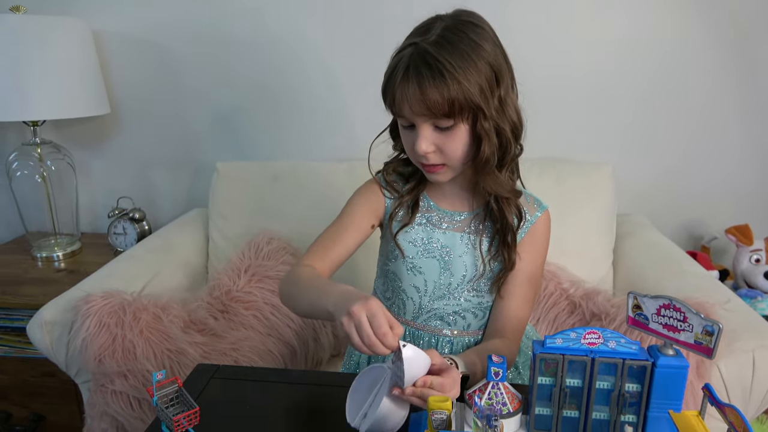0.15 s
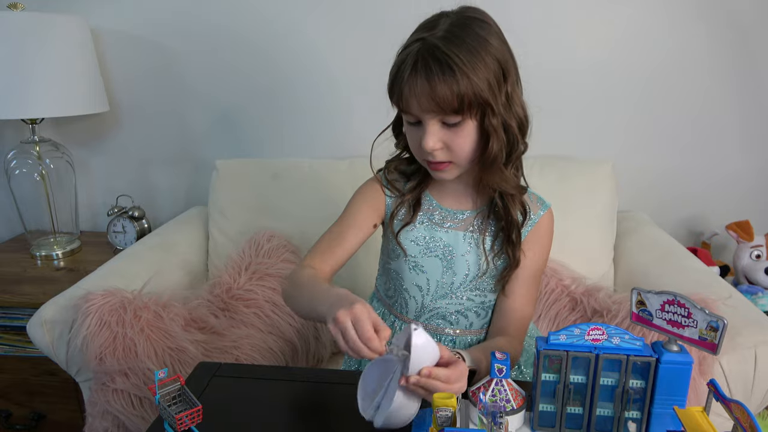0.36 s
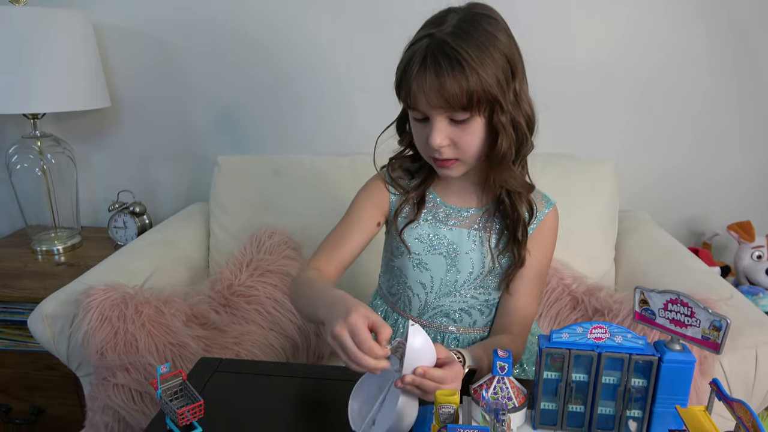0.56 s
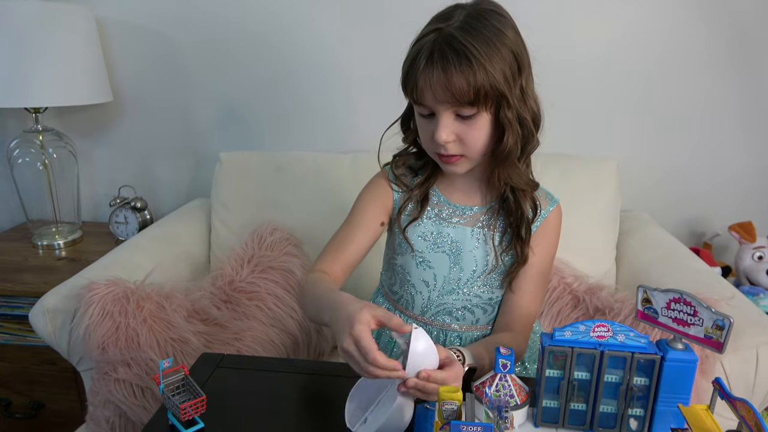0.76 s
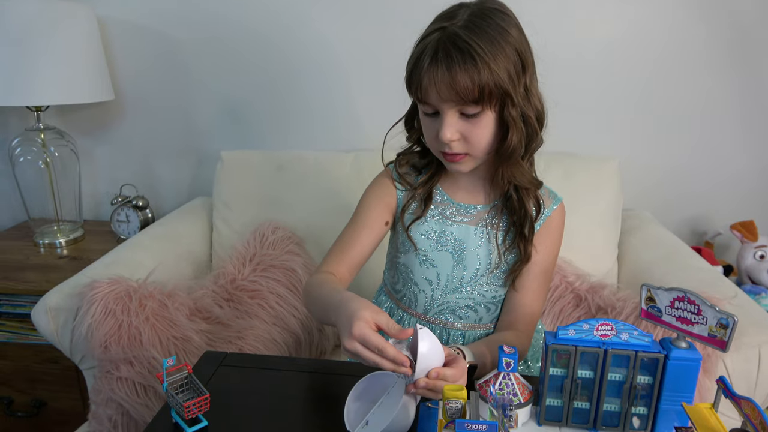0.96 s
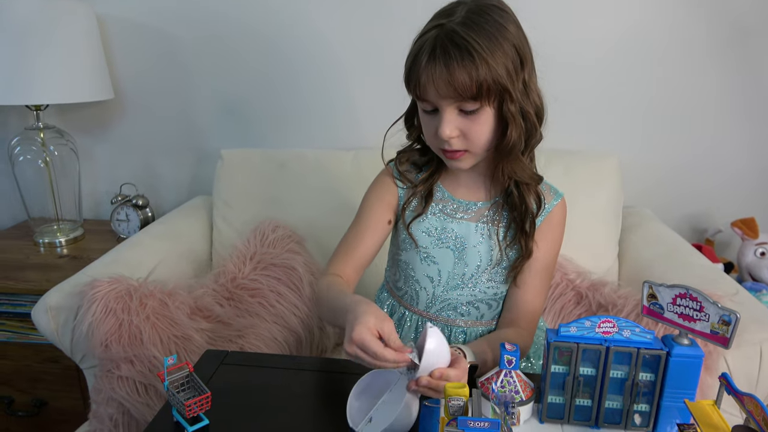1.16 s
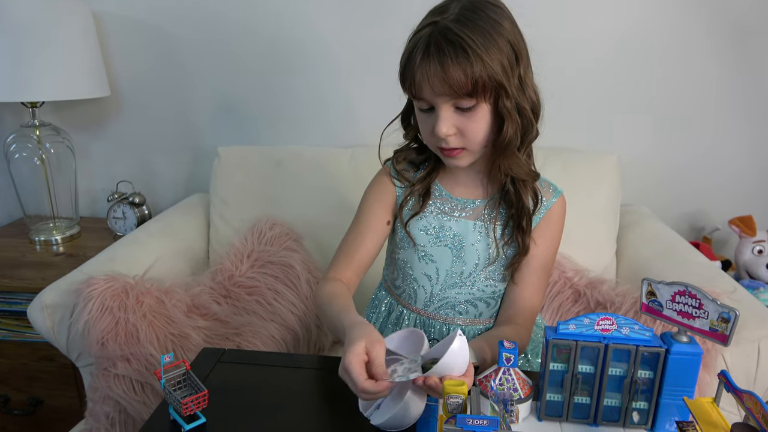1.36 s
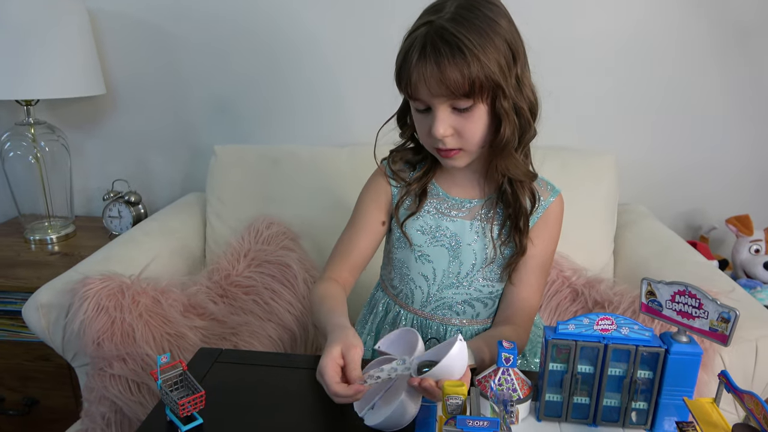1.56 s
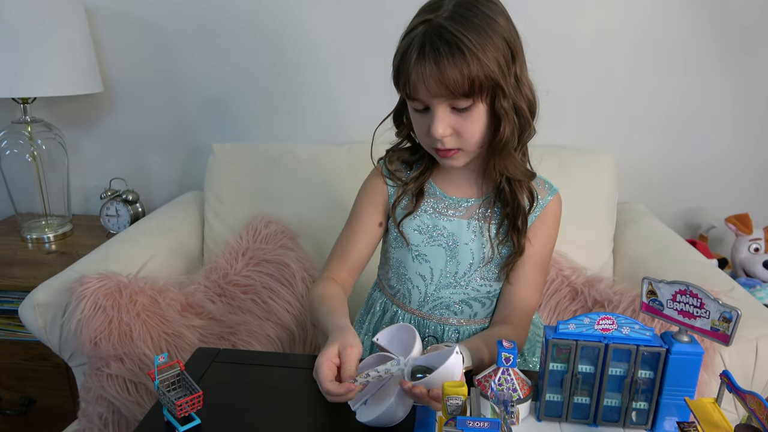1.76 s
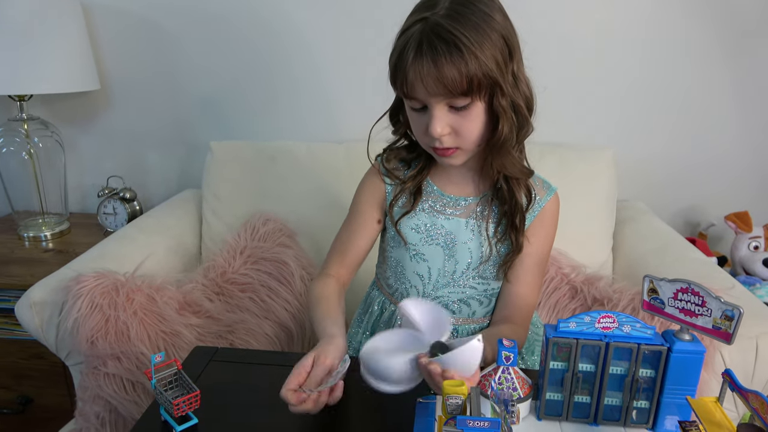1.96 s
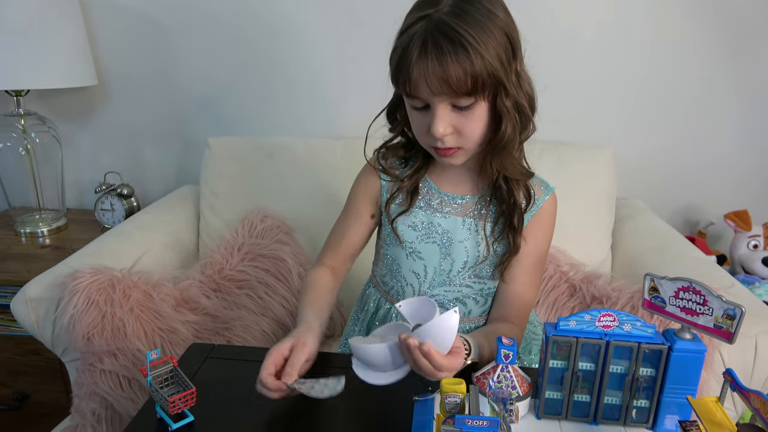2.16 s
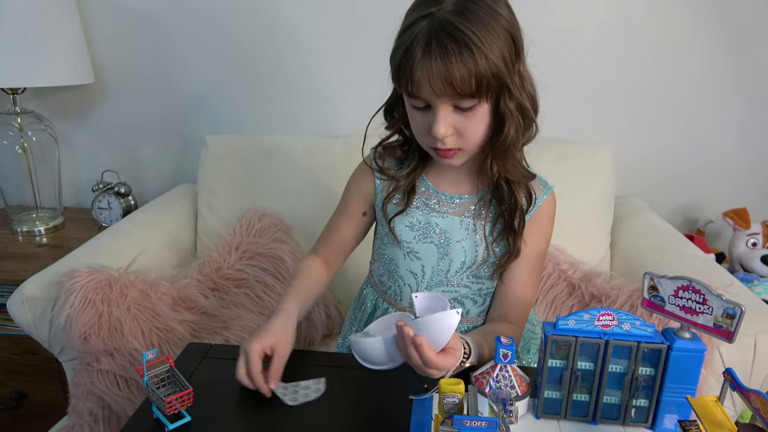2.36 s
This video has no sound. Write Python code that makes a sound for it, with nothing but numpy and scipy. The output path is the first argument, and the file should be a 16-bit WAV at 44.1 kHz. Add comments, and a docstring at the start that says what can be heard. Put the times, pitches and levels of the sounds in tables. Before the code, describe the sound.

A hard plastic toy capsule is pulled open with a quick rattling crack and knocks, then soft handling bumps, a flap, crisp film crinkling, and a final clatter and clonk, close to the microphones in a quiet living room.

```python
"""A hard plastic toy capsule is pulled open over a table in a small living room. Its thin shell segments judder
apart, knock, flap, ping, clatter and clonk: each blow is a noisy contact plus decaying modes, and the grinding
rims are a dense run of tiny slips. Soft thumps on the table lie between. A small wrapped item is drawn out; its
film crinkles in random creases and snaps in short bursts. The table thumps faintly, the room adds decaying
noise echoes, and its still air is steady coloured noise."""
import sys
import numpy as np
from scipy import signal
from scipy.fft import rfft, irfft, next_fast_len
from scipy.io import wavfile

SR = 44100
rng = np.random.default_rng(int(sys.argv[2]) if len(sys.argv) > 2 else 0)


def generate_wav(signal):
    """Clip the signal to [-1, 1] and save it as 16-bit WAV at the path in sys.argv[1]."""
    frames = np.transpose(np.atleast_2d(signal))
    scaled = np.clip(frames, -1, 1) * 32767
    pcm = np.round(scaled).astype(np.int16)
    wavfile.write(sys.argv[1], SR, pcm)


N = 106766
T = np.arange(N) / SR  # s
BANDS = 25 * 2 ** (np.arange(29) / 3)  # third-octave centres, Hz
BANK = [signal.butter(2, [hz / 2 ** (1 / 6), hz * 2 ** (1 / 6)], "band", fs=SR, output="sos") for hz in BANDS]
MOVE_S = .06  # time between one echo pattern and the next


def from_db(db):
    """Level to amplitude: 20 dB is a factor of ten."""
    return 10 ** (np.asarray(db) / 20)


def at_hz(points, hz):
    """Logarithmic frequency scale: interpolate a (frequency, value) table along it."""
    f, v = np.transpose(points)
    return np.interp(np.log(hz), np.log(f), v)


def unit(x):
    """Energy normalization: scale each row to a sum of squares of 1."""
    return x / np.sqrt(np.sum(x ** 2, axis=-1, keepdims=True) + 1e-30)


def fade(t, t60):
    """Exponential decay: the level falls 60 dB in t60 seconds."""
    return from_db(-60 * t / max(t60, 1e-3))


def add(track, s, sound):
    """Superposition: mix a sound into the track from time s."""
    i = int(np.clip(s * SR, 0, N - 1))
    track[i:i + len(sound)] += sound[:N - i]


def coloured(x, colour):
    """Filter-bank shaping: a steady signal gets a set level in each third octave."""
    x = np.pad(x, (SR // 2, 0), "reflect") + 1e-18  # lead-in lets the filters settle
    total = 0
    for k, (hz, sos) in enumerate(zip(BANDS, BANK)):
        band = unit(signal.sosfilt(sos, x)[-N:])
        total = total + from_db(at_hz(colour, hz)) * band * (-1) ** k  # neighbouring bands alternate in sign
    return total * np.sqrt(N)


def causal_filter(gain_db):
    """Minimum phase: folding the cepstrum gives a causal response with these gains."""
    cepstrum = irfft(np.log(from_db(gain_db)))
    half = cepstrum.shape[-1] // 2
    fold = np.r_[1, np.full(half - 1, 2), 1, np.zeros(half - 1)]
    return np.exp(rfft(cepstrum * fold))


def moving(x, responses):
    """Time-varying convolution: the hands move, so each short stretch meets another pattern of echoes."""
    hop, out = int(MOVE_S * SR), np.zeros(N)
    padded, window = np.pad(x, (0, 3 * hop)), signal.get_window("hann", 2 * hop)
    for k, response in enumerate(responses):
        stretch = padded[k * hop:(k + 2) * hop] * window
        add(out, (k * hop + .5) / SR, signal.fftconvolve(stretch, response))
    return out


# still air of the room: (frequency [Hz], relative level per third octave [dB])
AIR_COLOUR = [(25, -86), (40, -73.5), (65, -88.5), (125, -79), (300, -77.5), (600, -68.5), (1000, -71),
              (2000, -77.5), (3300, -88), (5000, -72.5), (10000, -84.5), (15000, -81)]


def still_air():
    """Stationary broadband noise: the air of the room is a steady random signal, coloured by band."""
    return coloured(rng.standard_normal(N), AIR_COLOUR)


# decay of the room: (frequency [Hz], reverberation time [s])
ROOM_T60 = [(150, 0.24), (600, 0.52), (2000, 0.32), (5000, 0.45), (14000, 0.37)]
# reverberant against direct sound: (frequency [Hz], level [dB])
ROOM_LEVEL = [(150, 2), (600, -6), (2000, -0.5), (5000, -3), (14000, -6)]
WALL_DELAY_S, NEAR_ECHO_DB = 0.012, -9
WALL_ECHO_DB, WALL_ECHO_S = 6.5, 0.024  # the first wall echoes stand out of the tail


def room(x):
    """Statistical reverberation: weak echoes from table and furniture, then walls and a tail dying by octave."""
    t = T[:SR * 3 // 5]
    wall_db = WALL_ECHO_DB * np.exp(-np.abs(t - WALL_DELAY_S) / WALL_ECHO_S)
    density = from_db(np.where(t < WALL_DELAY_S, NEAR_ECHO_DB, wall_db))
    white = rng.standard_normal((2, int(N / SR / MOVE_S), len(t)))
    responses = 0
    for k, hz in enumerate(100 * 2. ** np.arange(8)):
        sos = signal.butter(2, [hz / np.sqrt(2), hz * np.sqrt(2)], "band", fs=SR, output="sos")
        envelope = unit(density * fade(t, at_hz(ROOM_T60, hz))) * from_db(at_hz(ROOM_LEVEL, hz))
        responses = responses + signal.sosfilt(sos, white[k % 2] * envelope)  # adjacent octaves differ
    return x + moving(x, responses)


# side signal against mid signal: (frequency [Hz], level [dB])
STEREO_WIDTH = [(100, -11), (500, -13), (1500, -21), (3500, -19.5), (6000, -9.5), (9000, -6.5),
                (14000, -12)]
LEFT_DB, RIGHT_DB = -.5, 1


def microphones(x):
    """Partial coherence: two close microphones hear nearly the same; scatter parts them most in the treble."""
    t, size = T[:SR // 20], next_fast_len(N + SR)
    scatter = unit(rng.standard_normal((int(N / SR / MOVE_S), len(t))) * fade(t, 0.084))
    scattered = moving(x, scatter)
    hz = np.maximum(np.fft.rfftfreq(size, 1 / SR), 1)
    side = irfft(rfft(scattered, size) * from_db(at_hz(STEREO_WIDTH, hz)), size)[:N]
    return np.array([(x + side) * from_db(LEFT_DB), (x - side) * from_db(RIGHT_DB)])


# the capsule's weight nudges the table: (time [s], relative level [dB])
NUDGES = [(0.3, -42), (0.395, -43.5), (0.832, -49), (2.08, -44)]
# modes of the table top: (frequency [Hz], relative level [dB], decay time t60 [s])
TABLE_MODES = [(83, -13, 0.11), (110, 1, 0.11), (175, -5.5, 0.21)]
NUDGE_S = 0.0041  # time constant of the soft rise


def table():
    """Modal response to a soft push: the table top answers with a faint low thump."""
    out, t = np.zeros(N), T[:SR // 3]
    modes = sum(from_db(db) * np.sin(2 * np.pi * hz * t) * fade(t, t60) for hz, db, t60 in TABLE_MODES)
    thump = modes * (1 - np.exp(-t / NUDGE_S))
    for s, db in NUDGES:
        add(out, s, from_db(db) * thump)
    return out


BASS_CORNER_HZ = 113  # the small parts radiate little below this
STRIKE = 0.38  # first impact against the vibration that follows


def contacts(rows, row_hz, colour, t60s):
    """Impact excitation: each contact is a click and a noise burst, its bands decaying at their own rates."""
    size = 4096
    t, out = T[:size], np.zeros(N)
    hz = np.maximum(np.fft.rfftfreq(2 * size, 1 / SR), 1)
    white = rng.standard_normal((len(rows), size))
    white[:, 0] = STRIKE * np.pi
    bursts, below = 0, 0
    for edge in (500, 1200, 2800, 6000, 18000):  # Hz; each band lies between successive lowpasses
        low = signal.sosfilt(signal.butter(1, edge, fs=SR, output="sos"), white)
        bursts = bursts + (low - below) * fade(t, at_hz(t60s, edge / np.sqrt(2)))
        below = low
    # overlapping triangular weights around the third-octave centres
    bands = np.array([np.interp(np.log(hz), np.log(BANDS), row) for row in np.eye(len(BANDS))])
    decay_size = [np.linalg.norm(fade(t, d)) for d in at_hz(t60s, BANDS)]
    body = from_db(at_hz(colour, BANDS)) * decay_size / (1 + (BASS_CORNER_HZ / BANDS) ** 4)
    for (s, *levels), burst in zip(rows, rfft(bursts, 2 * size)):
        raw = np.sqrt(bands @ np.abs(burst) ** 2 / size)
        blow_db = np.interp(np.log(BANDS), np.log(row_hz), levels)
        db = blow_db + 20 * np.log10(body / raw)  # also levels out the burst's own spectrum
        add(out, s, irfft(burst * causal_filter(db @ bands))[:size])
    return out


def ringing(rows, row_hz, modes, ring_db, scatter_db, detune):
    """Modal synthesis: each blow sets the modes ringing, a little differently each time."""
    out, t = np.zeros(N), T[:SR // 4]
    hz, db, t60 = np.transpose(modes)
    decays = np.array([fade(t, d) for d in t60])
    draws = rng.standard_normal((len(rows), 3, len(hz)))
    for (s, *levels), (force, bend, side) in zip(rows, draws):
        blow_db = np.interp(np.log(hz), np.log(row_hz), levels)
        strength = from_db(ring_db + db + blow_db + scatter_db * force)
        tones = np.sin(2 * np.pi * np.outer(hz * (1 + detune * bend), t))
        add(out, s, (strength * np.sign(side)) @ (decays * tones))
    # little is radiated below the lowest mode
    return signal.sosfilt(signal.butter(2, hz.min() / np.sqrt(2), "high", fs=SR, output="sos"), out + 1e-18)


# how strongly the film crinkles: (time [s], relative level [dB])
CRINKLE = [(0, -63.5), (.16, -60), (.19, -63), (.26, -50.5), (1.17, -62), (1.23, -53), (1.28, -50),
           (1.36, -37), (1.44, -48), (1.50, -42), (1.56, -37.5), (1.62, -37), (1.66, -83), (1.80, -73),
           (1.842, -56), (1.87, -49.5), (1.95, -110), (1.99, -47), (2.06, -31), (2.13, -74), (2.42, -55.5)]
# spectrum of the creases: (frequency [Hz], relative level [dB])
CRINKLE_COLOUR = [(120, -17), (300, -30), (600, 15.5), (1200, 10.5), (2200, 16), (4500, 10), (9000, 13),
                  (15000, 3)]
# film snaps: (time [s], relative level at 1.5 kHz [dB], at 4 kHz [dB], at 10 kHz [dB])
SNAPS = [(.1575, -24, -42, -49), (.167, -40, -32, -29.5), (.268, -53, -56, -40), (.863, -64, -58, -42),
         (.940, -36, -40, -29.5), (1.191, -70, -36, -46), (1.2035, -40, -33.5, -26.5),
         (1.3445, -23.5, -33, -31), (1.406, -22.5, -18, -36.5), (1.5255, -50, -31, -23),
         (1.535, -57, -24.5, -19), (1.541, -23, -28, -38), (1.553, -21.5, -23.5, -15.5),
         (1.5935, -23.5, -21, -19.5), (1.8215, -28, -20.5, -15.5), (1.968, -17, -11.5, -13),
         (2.012, -17.5, -13, -37), (2.036, -24, -18, -38)]
# frequencies of the snap levels: (frequency [Hz])
SNAP_HZ = [1500, 4000, 10000]
# decay of the snap bursts: (frequency [Hz], decay time t60 [s])
SNAP_T60 = [(300, 0.0029), (3000, 0.022), (12000, 0.0062)]
# broad colour of the film: (frequency [Hz], relative level [dB])
FILM_COLOUR = [(120, -25.5), (300, -25), (650, -11.5), (1250, -18), (1600, -10), (2000, -9), (3200, -11),
               (4100, -7.5), (5100, -7.5), (7000, -6.5), (8200, -6), (10500, -7), (13000, -8.5),
               (15500, -14)]
# brief ringing of the taut film: (nominal frequency [Hz], relative level [dB], decay time t60 [s])
SNAP_MODES = [(4340, -9, 0.0047), (7030, -7.5, 0.0095), (10000, -1.5, 0.0021)]
CREASES_PER_S, CREASE_SPREAD_DB = 1700, 2.5  # mean rate; scale of the random excess level


def wrapper():
    """Buckling of a thin film: a few sharp snaps among many tiny creases at random instants."""
    excess_db = CREASE_SPREAD_DB * np.minimum(rng.exponential(1, N), 4)
    sizes = from_db(excess_db) * rng.choice([-1, 1], N)
    impulses = sizes * (rng.random(N) < CREASES_PER_S / SR)
    creases = unit(coloured(impulses, CRINKLE_COLOUR)) * np.sqrt(N)
    snaps = contacts(SNAPS, SNAP_HZ, FILM_COLOUR, SNAP_T60)
    snaps += ringing(SNAPS, SNAP_HZ, SNAP_MODES, ring_db=-.5, scatter_db=-7.0, detune=0.011)
    return creases * from_db(np.interp(T, *np.transpose(CRINKLE))) + snaps


# frequencies of the levels in every table of blows: (frequency [Hz])
BLOW_HZ = [250, 550, 1150, 2200, 4000, 10000]
# broad resonances of the shell: (frequency [Hz], relative level [dB])
SHELL_COLOUR = [(120, -20), (180, -20), (270, -7.5), (350, -9.5), (560, -1), (790, -6.5), (1150, 0),
                (1600, -3.5), (2050, 6.5), (2550, -6.5), (3150, -0.5), (3800, -5), (7500, 2), (11000, -2.5),
                (15000, -10)]
# decay of the contact bursts: (frequency [Hz], decay time t60 [s])
CONTACT_T60 = [(200, 0.032), (800, 0.048), (2000, 0.04), (5000, 0.074), (14000, 0.051)]
GRIP_DETUNE = 0.024  # the fingers bend the shell: relative spread of mode frequencies from blow to blow


def plastic(rows, modes, contact_db, ring_db, scatter_db, detune):
    """Source and resonator: a blow on the shell is its contact noise plus the modes it excites."""
    contact = from_db(contact_db) * contacts(rows, BLOW_HZ, SHELL_COLOUR, CONTACT_T60)
    return contact + ringing(rows, BLOW_HZ, modes, ring_db, scatter_db, detune)


# soft thumps on the table: # (time [s], relative level at 250 Hz, 550 Hz, 1.15 kHz, 2.2 kHz, 4 kHz, 10 kHz
# [dB])
BUMPS = [(.626, -27.5, -52, -39, -54, -67, -71), (.777, -51, -44, -28.5, -46, -55, -57.5),
         (.832, -36, -31.5, -31, -40, -50.5, -58), (.851, -51, -38, -38.5, -44, -59, -70),
         (1.052, -43.5, -43, -49, -73, -77, -67), (1.076, -36.5, -32.5, -31, -41.5, -62, -63),
         (1.220, -41, -43, -46.5, -39, -50.5, -52)]
# modes of the table rung by the thumps: (nominal frequency [Hz], relative level [dB], decay time t60 [s])
BUMP_MODES = [(276, -6, 0.13), (629, -1.5, 0.13), (747, -3, 0.14), (935, -4.5, 0.12), (1520, -5, 0.12),
              (1894, -2.5, 0.14)]


def bumps():
    """Soft impact: thumps on the table ring the table's low and middle modes."""
    return plastic(BUMPS, BUMP_MODES, contact_db=0.5, ring_db=1, scatter_db=4.5, detune=GRIP_DETUNE)


# a loose segment falls back and settles:
# (time [s], relative level at 250 Hz, 550 Hz, 1.15 kHz, 2.2 kHz, 4 kHz, 10 kHz [dB])
CLONKS = [(2.1705, -49, -29.5, -26, -25, -25.5, -33), (2.1765, -60.5, -24, -20, -23.5, -36, -52),
          (2.204, -47, -33, -26.5, -24, -29, -45), (2.3045, -47.5, -31.5, -41, -37.5, -52, -64)]
# modes of the clonk: (nominal frequency [Hz], relative level [dB], decay time t60 [s])
CLONK_MODES = [(404, -5, 0.069), (555, 4.5, 0.04), (1201, 7.5, 0.029), (1630, -7, 0.076), (1920, 1, 0.096),
               (2245, -4, 0.14), (3300, -8, .04), (5564, -4.5, 0.099)]


def clonks():
    """Repeated impact: a loose segment falls back with a hollow clonk and settles."""
    return plastic(CLONKS, CLONK_MODES, contact_db=-3.5, ring_db=-2.0, scatter_db=0.2, detune=0.0115)


# the open segments clatter together:
# (time [s], relative level at 250 Hz, 550 Hz, 1.15 kHz, 2.2 kHz, 4 kHz, 10 kHz [dB])
CLATTERS = [(2.0535, -30.5, -34.5, -25.5, -19, -24, -26.5), (2.059, -32, -31.5, -29.5, -33, -26, -42),
            (2.073, -46, -43, -37, -42, -26, -39)]
# modes of the clatter: (nominal frequency [Hz], relative level [dB], decay time t60 [s])
CLATTER_MODES = [(279, -11.5, .1), (682, 5, 0.064), (1154, -4, 0.075), (2280, 2.5, 0.054),
                 (2390, -1.5, .05), (2712, 4, 0.058), (3500, 0, 0.049), (5450, -2, .08)]


def clatters():
    """Impacts in quick succession: the open segments clatter, each blow overlapping the last one's ringing."""
    return plastic(CLATTERS, CLATTER_MODES, contact_db=-2.0, ring_db=-1.0, scatter_db=2.5, detune=0.0084)


# the shell is struck so that it pings:
# (time [s], relative level at 250 Hz, 550 Hz, 1.15 kHz, 2.2 kHz, 4 kHz, 10 kHz [dB])
PINGS = [(.506, -50, -26, -29, -26.5, -24.5, -35)]
# modes of the ping: (nominal frequency [Hz], relative level [dB], decay time t60 [s])
PING_MODES = [(3140, 7.5, 0.052), (3250, 1, 0.05), (4370, 2, 0.04), (5030, -7, .08), (5475, -14, .07)]


def pings():
    """Selective excitation: a blow on the shell rings in a few high modes only."""
    return plastic(PINGS, PING_MODES, contact_db=-2, ring_db=1, scatter_db=1, detune=.003)


# a segment swings open against its stop:
# (time [s], relative level at 250 Hz, 550 Hz, 1.15 kHz, 2.2 kHz, 4 kHz, 10 kHz [dB])
FLAPS = [(1.454, -42, -36, -18, -15, -22, -32)]
# modes of the flap: (nominal frequency [Hz], relative level [dB], decay time t60 [s])
FLAP_MODES = [(418, 5, 0.057), (594, 0.5, .1), (1025, -4, 0.19), (1162, -8, 0.12), (1279, -5, 0.087),
              (1370, -6.5, 0.096), (1907, -3.5, 0.16), (2110, -18, .12), (3030, -14, 0.082),
              (3475, -3, 0.093)]


def flaps():
    """Impact on a stop: a segment swings open and rings in its own modes."""
    return plastic(FLAPS, FLAP_MODES, contact_db=-2.0, ring_db=0.5, scatter_db=-1.0, detune=0.0013)


# how hard the rims grind as the capsule is pulled open: (time [s], relative level [dB])
SEAM = [(.30, -31), (.328, -26), (.338, -25), (.346, -26), (.363, -18), (.39, -72)]
# resonances of the rims: (frequency [Hz], relative level [dB], decay time t60 [s])
SEAM_MODES = [(2690, 4, 0.032), (3040, 1, 0.04), (3200, -21, 0.018), (4060, 3.5, 0.045), (4820, 3.5, 0.015)]
SLIPS_PER_S, SLIP_SPREAD_DB = 400, 3.5  # mean rate; standard deviation of slip level


def seam():
    """Friction as random impulses: the rims grind past each other in tiny slips that ring their resonances."""
    t, out = T[:SR // 20], 0
    slips = rng.random(N) < SLIPS_PER_S / SR
    for hz, db, t60 in SEAM_MODES:
        sizes = from_db(SLIP_SPREAD_DB * rng.standard_normal(N)) * rng.choice([-1, 1], N)
        mode = np.sin(2 * np.pi * hz * t) * fade(t, t60)
        out = out + from_db(db) * signal.fftconvolve(slips * sizes, mode)[:N]
    # silent outside the table's times
    grind = from_db(np.interp(T, *np.transpose(SEAM), left=-np.inf, right=-np.inf))
    return unit(out) * np.sqrt(N) * grind


# shell segments strike each other:
# (time [s], relative level at 250 Hz, 550 Hz, 1.15 kHz, 2.2 kHz, 4 kHz, 10 kHz [dB])
KNOCKS = [(.2825, -59, -43, -36, -30, -51, -47), (.2972, -52, -22.5, -27.5, -14.5, -23.5, -19),
          (.302, -46, -31, -34.5, -17, -21.5, -24), (.3165, -50, -43, -26, -27, -19.5, -20.5),
          (.336, -52, -25, -25.5, -14, -18, -25.5), (.348, -66, -29, -25, -18, -25, -28),
          (.356, -31, -31, -45, -19, -57, -18), (.361, -51, -22, -30.5, -36, -17.5, -46),
          (.370, -60, -31, -45, -38, -34, -28), (.394, -34.5, -30.5, -41, -56, -33, -36),
          (.437, -43, -44, -29, -36, -42, -42), (.4665, -67, -22.5, -31, -23.5, -26.5, -39),
          (.474, -45, -35.5, -20, -24.5, -44, -50), (.503, -39, -38, -27.5, -19, -42, -46),
          (.586, -79, -32.5, -32.5, -30.5, -39, -45.5), (.600, -37.5, -41.5, -32, -32, -41, -52),
          (.6245, -42, -30.5, -32, -30, -26.5, -39), (.646, -55, -43.5, -33, -34, -38, -50),
          (1.289, -65, -42.5, -38.5, -33.5, -48.5, -49), (1.926, -52, -34, -31.5, -43.5, -40.5, -52),
          (1.970, -38, -25.5, -38, -34, -31, -76), (1.988, -55, -23.5, -40, -35.5, -46, -34),
          (2.000, -57, -28.5, -28, -46, -45, -34)]
# modes of the shell: (nominal frequency [Hz], relative level [dB], decay time t60 [s])
SHELL_MODES = [(424.6, -8, 0.21), (564, -8.5, 0.11), (619, -6, 0.25), (748, -14, 0.16), (997, -14.5, 0.16),
               (1051, -5, 0.18), (1142, -3.5, 0.093), (1463, 1.5, 0.14), (1539, -3, .11), (1997, 1, 0.097),
               (2243, -6.5, .12), (3120, 2, 0.048), (4430, -11, 0.066), (5560, -5, 0.083)]


def knocks():
    """Impact of thin shells: the segments judder apart and knock, exciting the shell's modes."""
    return plastic(KNOCKS, SHELL_MODES, contact_db=0, ring_db=-3.5, scatter_db=3.5, detune=GRIP_DETUNE)


def scene():
    """Superposition of sources: capsule, table and wrapper in the quiet room."""
    handling = table() + wrapper() + bumps()
    direct = handling + clonks() + clatters() + pings() + flaps() + seam() + knocks()
    return microphones(from_db(-3.0) * room(direct) + still_air())


def record(dry):
    """Soft saturation and band limiting: the highest peaks are rounded and the top is cut."""
    top, cutoff_hz = 0.66, 16000
    rounded = top * np.tanh(dry / top)
    return signal.sosfilt(signal.ellip(10, .2, 80, cutoff_hz, fs=SR, output="sos"), rounded)


dry = scene()
out = record(dry)
generate_wav(out)
```